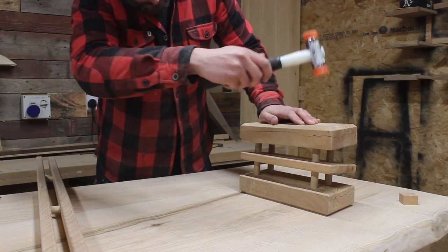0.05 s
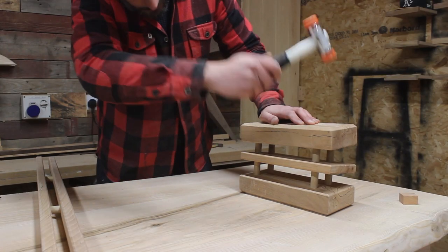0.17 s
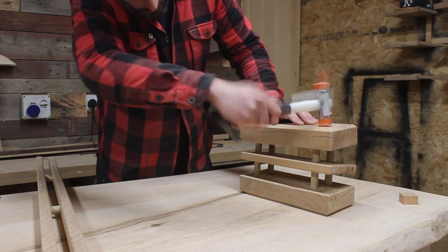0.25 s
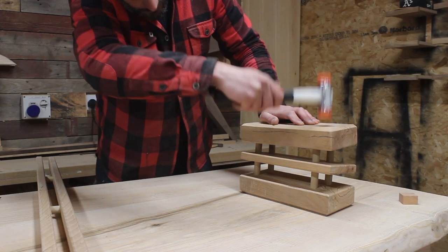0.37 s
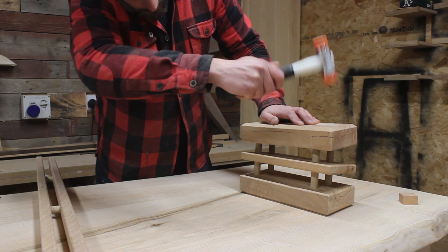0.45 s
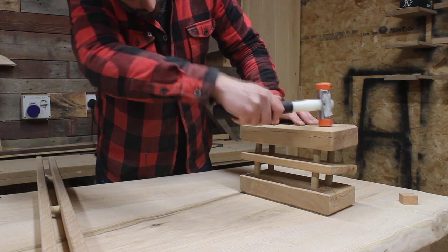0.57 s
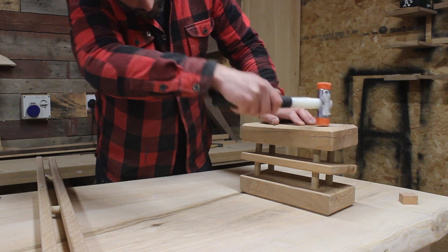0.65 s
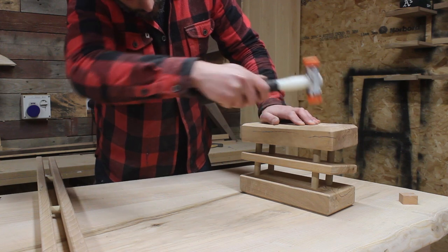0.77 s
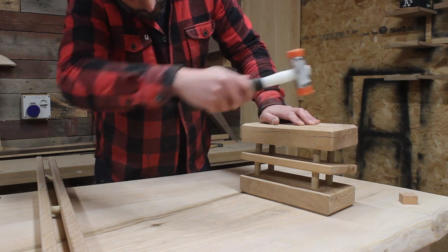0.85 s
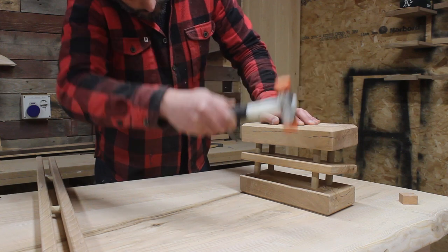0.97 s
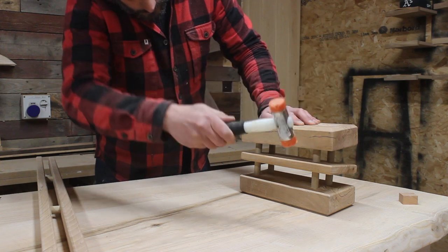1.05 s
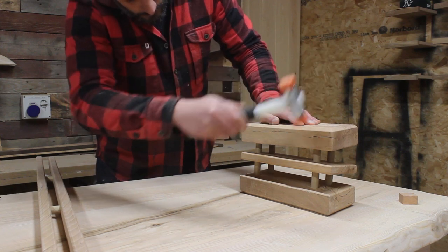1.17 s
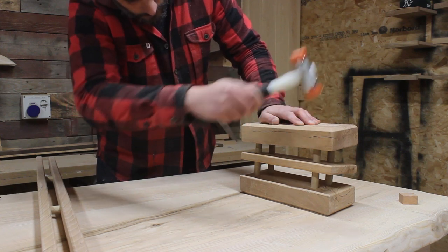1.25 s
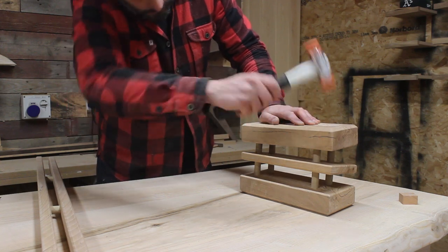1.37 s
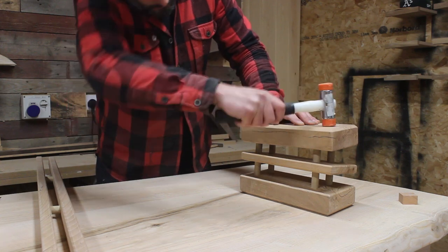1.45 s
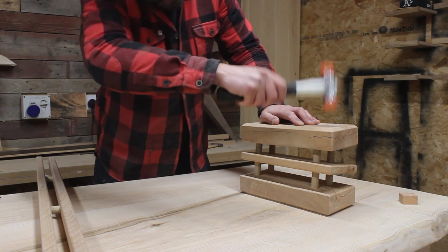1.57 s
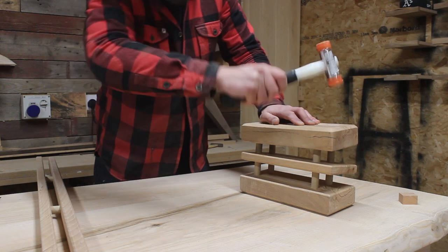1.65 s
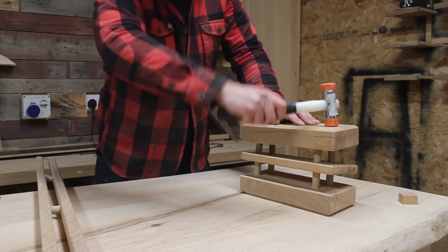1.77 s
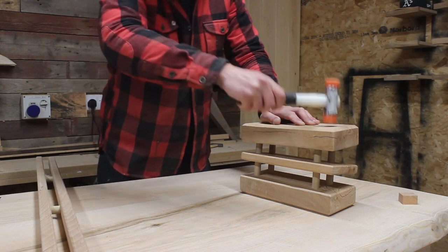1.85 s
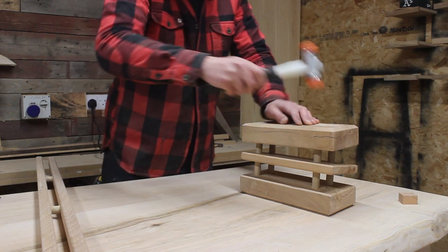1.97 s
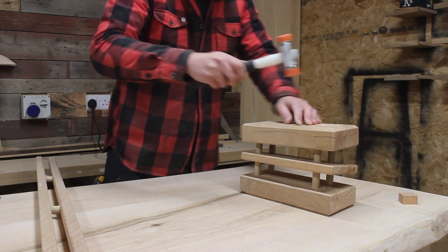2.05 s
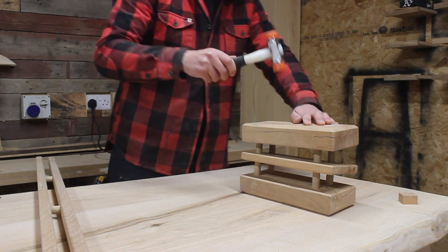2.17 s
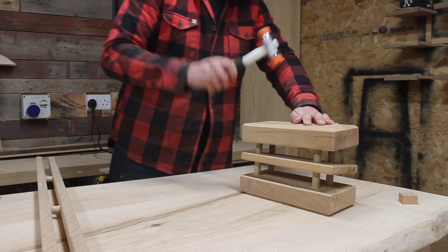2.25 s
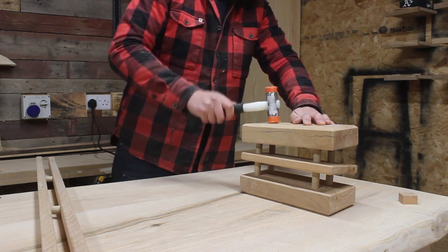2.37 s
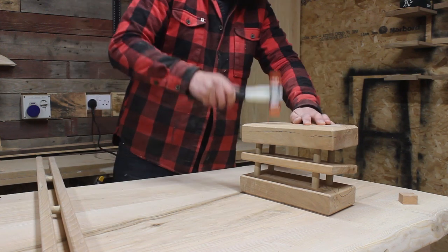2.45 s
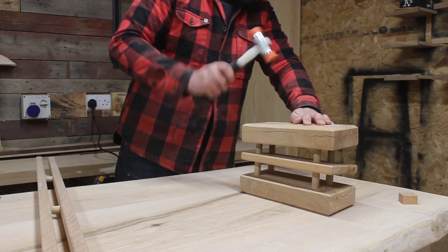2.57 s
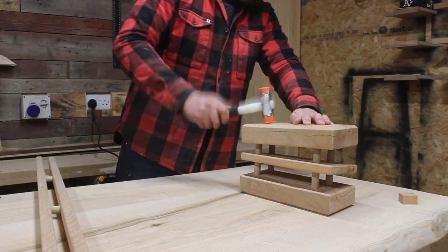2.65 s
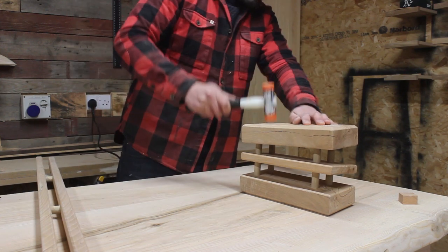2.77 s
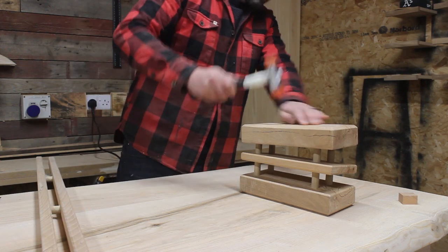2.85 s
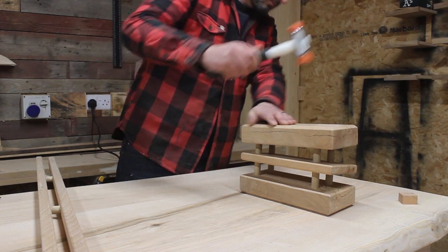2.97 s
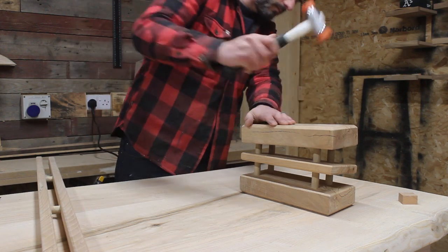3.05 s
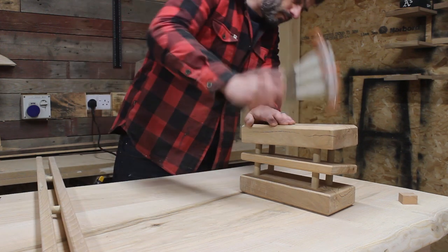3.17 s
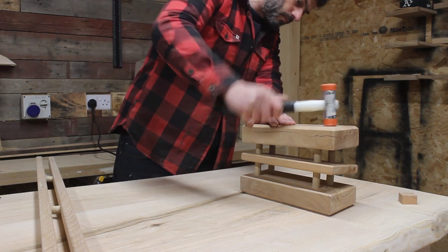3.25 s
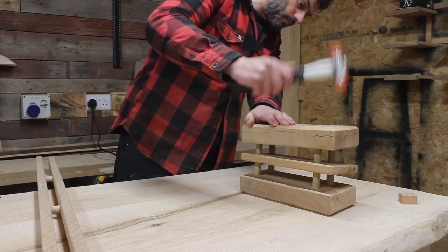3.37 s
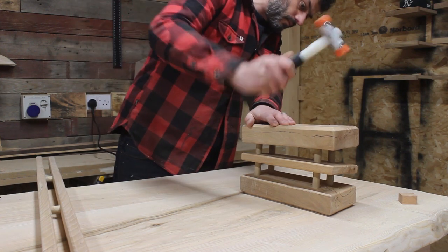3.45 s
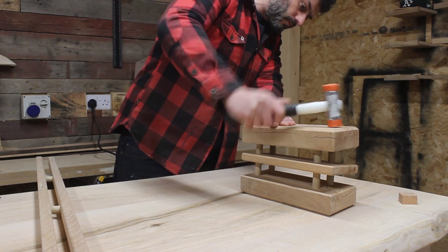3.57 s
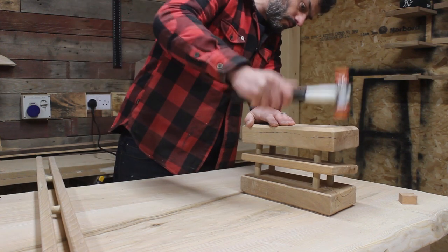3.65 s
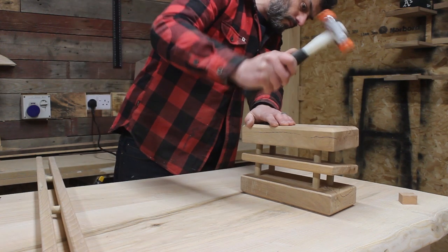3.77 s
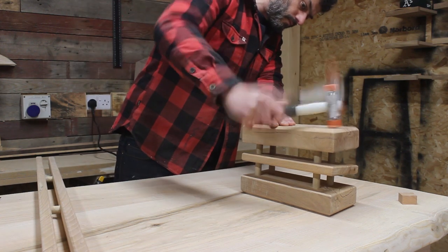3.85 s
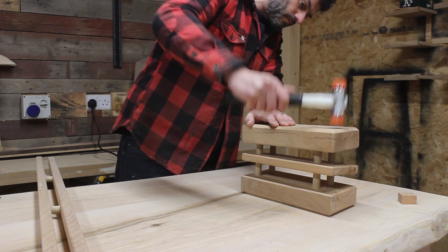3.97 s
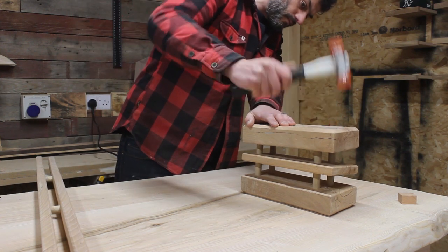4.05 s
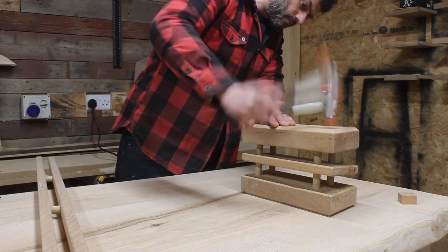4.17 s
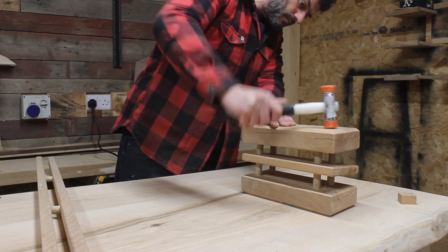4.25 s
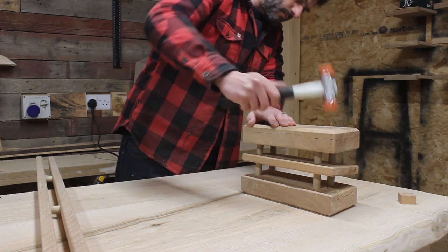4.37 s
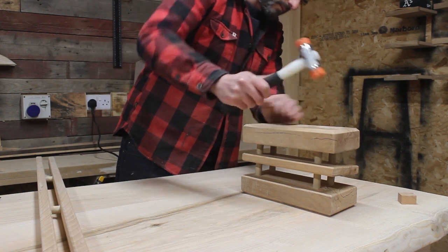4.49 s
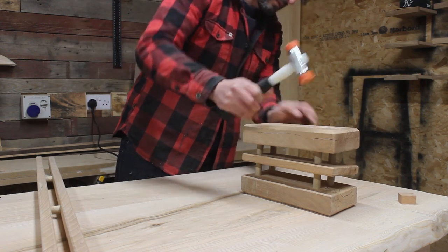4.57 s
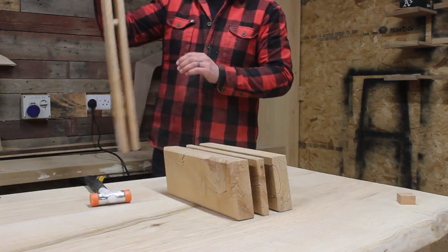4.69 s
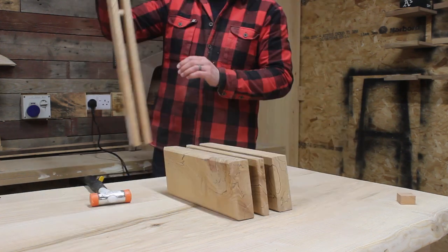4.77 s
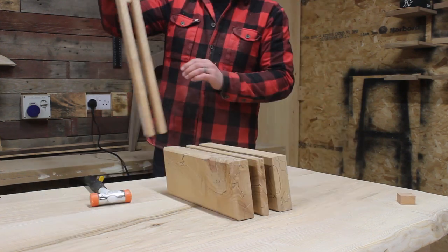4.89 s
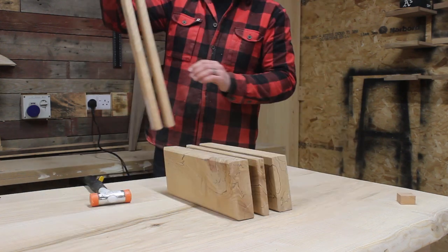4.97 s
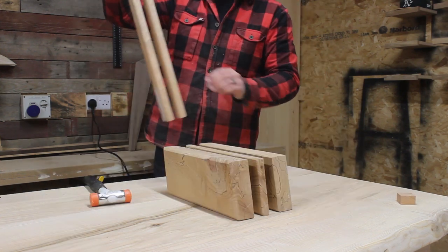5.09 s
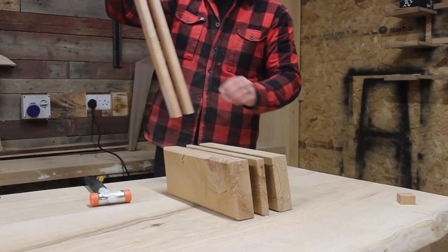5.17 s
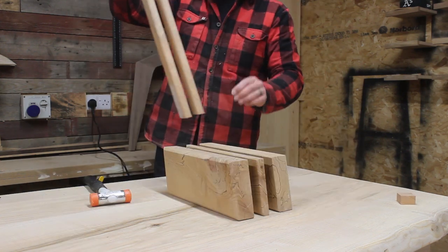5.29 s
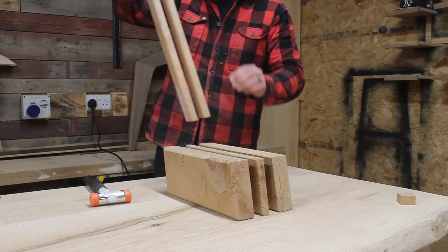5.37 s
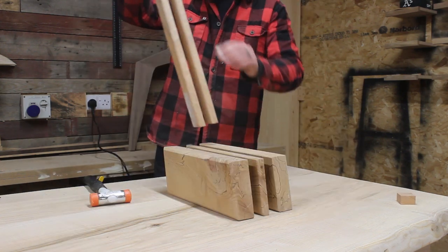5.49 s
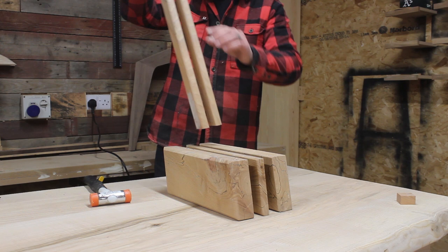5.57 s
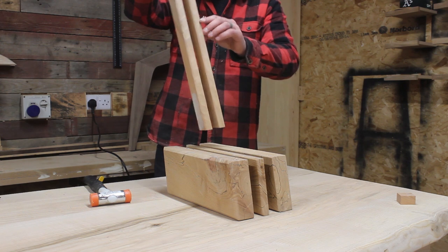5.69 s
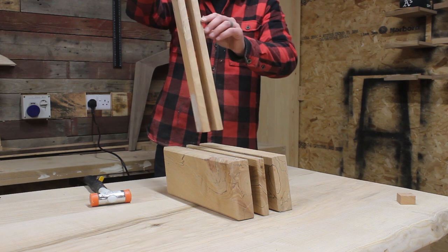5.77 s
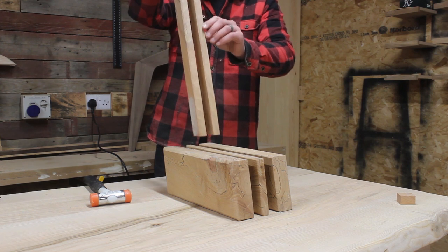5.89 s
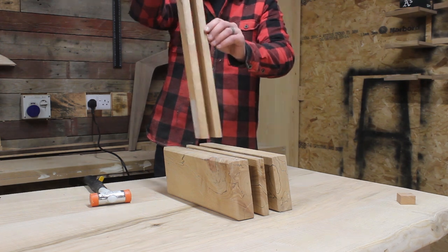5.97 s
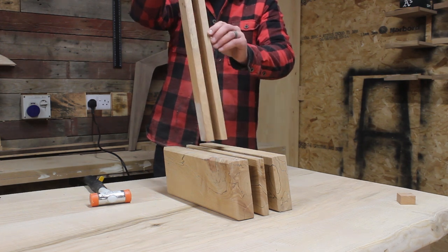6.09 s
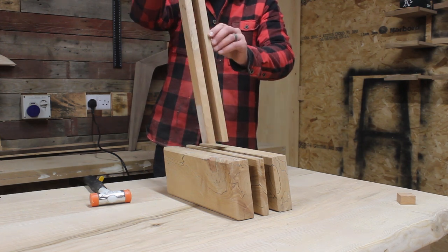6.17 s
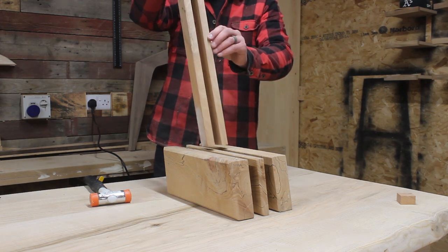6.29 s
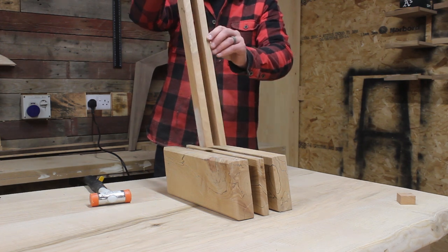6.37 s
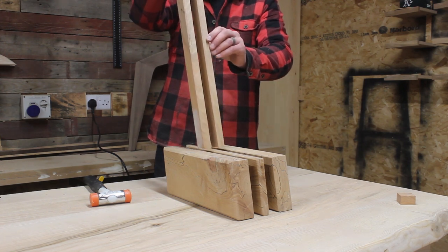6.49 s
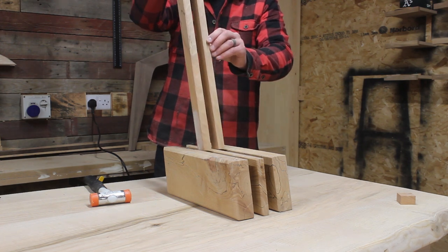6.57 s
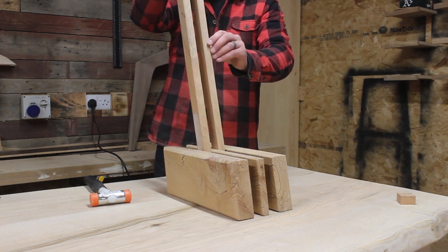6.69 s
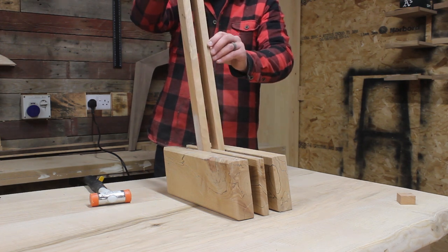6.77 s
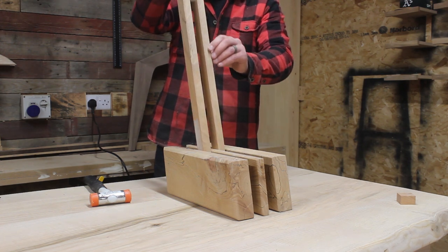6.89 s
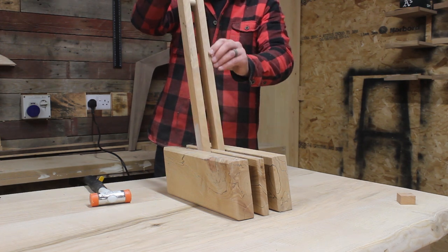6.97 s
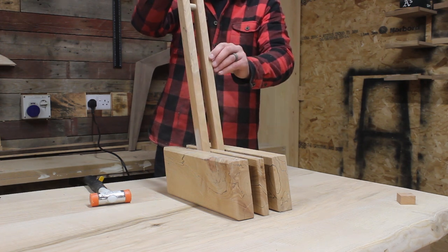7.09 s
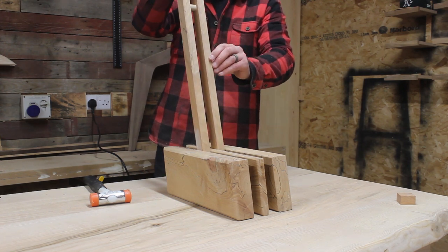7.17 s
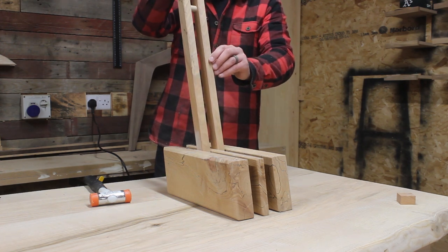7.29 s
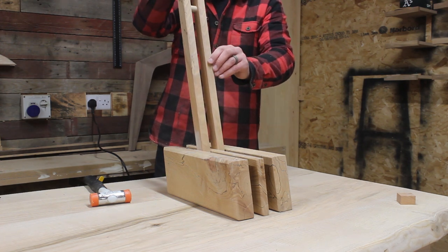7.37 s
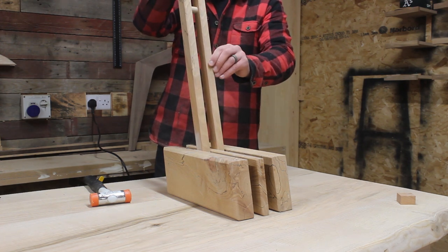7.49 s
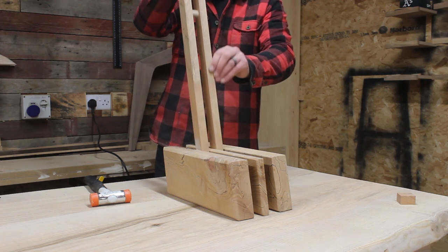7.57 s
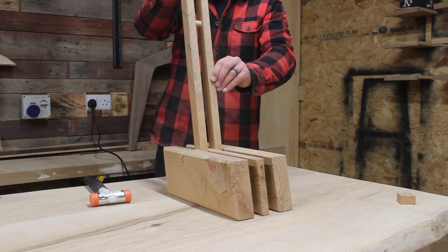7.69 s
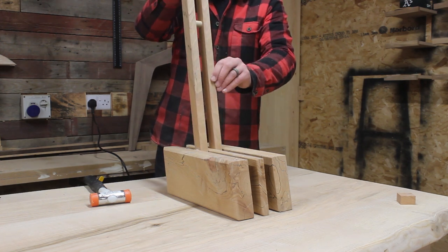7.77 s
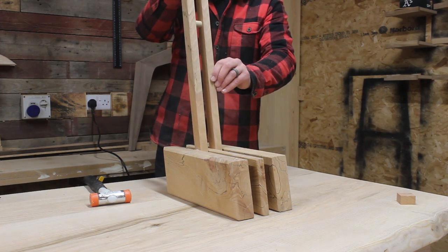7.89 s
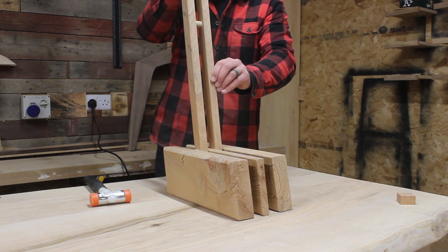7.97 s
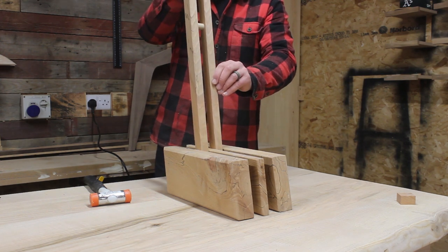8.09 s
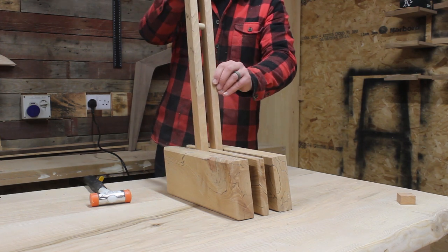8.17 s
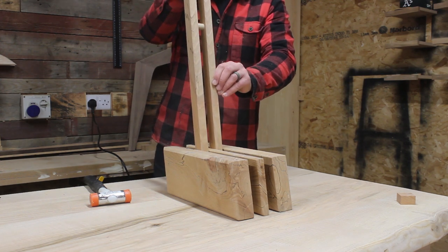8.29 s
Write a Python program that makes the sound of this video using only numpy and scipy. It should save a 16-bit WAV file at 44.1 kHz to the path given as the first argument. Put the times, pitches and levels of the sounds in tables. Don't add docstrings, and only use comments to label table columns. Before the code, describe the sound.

Soft-faced mallet bangs wood ten times, unevenly spaced and distorted; after a dip, rails jolt, drag and creak against a wooden block over faint hiss.

```python
import sys
import numpy as np
from scipy import signal
from scipy.io import wavfile
from scipy.ndimage import uniform_filter1d

SR = 44100
rng = np.random.default_rng(int(sys.argv[2]) if len(sys.argv) > 2 else 0)


def boost(x):
    u = np.asarray(x, float) / 20
    return 10 ** u


def dump(signal):
    limited = np.clip(np.atleast_2d(signal).T, -1, 1)
    pcm = np.round(limited * 32767).astype(np.int16)
    wavfile.write(sys.argv[1], SR, pcm)


N = 367353
T = np.arange(N) / SR

# start_s, level_db, bench_thud_db, knock_db (near 1350 Hz), bright_db (from 2200 Hz)
BLOWS = [
    (0.3459, -11, -5, -1.5, -3.5),
    (.6527, -13, -0.5, -5, -4),
    (1.5172, -7, -2.5, -3.5, -4.5),
    (1.806, -8.5, -3.5, -4, -4.5),
    (2.4298, -5, -13.5, 0, -2),
    (2.7428, -4.5, -9, 1, -7.5),
    (3.292, -7, -4, 3, -1),
    (3.6167, -3.5, -6.5, 0.5, -1.5),
    (3.949, -6.5, -6, 3, 2.5),
    (4.278, -13.5, 3.5, 4.5, 4),
]
EARLIER_BLOW = (-0.21, -22, -5, 3, -3)
# pitch_hz, level_db, t60_s
FRAME_MODES = [(61, -41, 0.04), (149.3, -25, 1), (190.5, -7.5, 0.22), (272.7, 2, 0.087), (323.7, 7, 0.054),
               (386.6, -9, 0.32), (440.7, 2, 0.083), (538, -2.5, 0.07), (610, -2.5, 0.15), (718, 0, 0.039),
               (805, 1, 0.026), (990, -11, 0.024), (993.4, -1.5, 0.043), (1072, -8.5, 0.31),
               (1139.6, -7, 0.14), (1254, 2.5, 0.032), (1380, -1, 0.019), (1423, -0.5, 0.036),
               (1577, -2, .03), (1768, -2, 0.032), (1838, 3, 0.02), (2155, -11.5, 0.1), (2550, -15, 0.045),
               (2424, -6.5, 0.012)]
# frequency_hz, level_db
SLAP_SPECTRUM = [(100, -29), (400, -6), (1200, -1), (2500, -11.5), (4000, -17.5), (8000, -23.5),
                 (12000, -31.5), (16000, -35)]
# time_s, level_db
MALLET_FADE = [(0, 7.5), (4.3, -2.5), (4.45, -5.5), (4.6, -11.5), (4.8, -35), (8.4, -46.5)]
# frequency_hz, t60_s
WALL_T60 = [(100, 1), (260, 0.69), (700, 0.83), (1840, 0.7), (4850, 0.44), (12800, 0.23)]
# frequency_hz, level_db
WALL_COLOUR = [(60, -10.5), (250, -7.5), (700, 3.5), (1150, 5.5), (1550, 0), (2200, 3.5), (6000, 5),
               (15000, -3.5)]
# delay_s, level_db
EARLY_ECHOES = [(.0031, -4), (.0062, -12.5), (.0105, -11.5), (.017, -14), (.024, -20.5)]

# pitch_hz, width_hz, level_db
BLOCK_MODES = [(290.3, 40, 8.5), (542, 78, -2), (699, 23, 3.5), (800, 41, -3), (930, 57, -4),
               (1130, 280, 9.5), (1215, 34, -6)]
# pitch_hz, width_hz, level_db
GRAIN_MODES = [(1610, 110, 0), (1820, 400, 14), (2220, 960, 18), (3020, 1400, 6.5)]
# pitch_hz, width_hz, level_db
FIZZ_MODES = [(4230, 1700, 3.5), (7850, 3300, -15)]
# start_s, rumble_db, t60_s, dryness_db, free_length_pitch_hz
JOLTS = [
    (6.029, -14.5, 0.64, -7, 1240),
    (6.43, -58, 0.44, -9, 750),
    (6.554, -50, .4, 2, 800),
    (6.671, -37, 0.24, -7.5, 745),
    (6.751, -33, 0.54, -17, 1000),
    (7.791, -28.5, 0.37, -8.5, 740),
    (8.019, -43, .3, -11, 735),
]
# start_s, length_s, rumble_db, dryness_db, pitch_hz
SLIDES = [
    (6.26, .05, -52, 1.5, 780),
    (6.695, 0.096, -33, -23, 760),
    (6.849, 0.24, -41.5, -7, 800),
    (6.988, .25, -42.5, -5, 1130),
    (7.494, .1, -48.5, -3.5, 800),
    (7.587, 0.22, -42.5, 1.5, 1010),
    (7.703, .05, -58.5, 13, 1020),
    (7.803, 0.24, -29.5, -12, 637),
    (8.038, .22, -47, -4.5, 870),
    (8.304, 0.098, -37.5, -13, 632),
]
# start_s, peak_db, pitch_hz, thud_db, tick_db
KNOCKS = [(6.0294, -14.5, 620, 2, -16), (6.356, -39, 2030, -18, -26), (6.448, -38.5, 684, -1, -27),
          (6.5556, -38, 2100, -21, 6.5), (6.675, -34, 920, 0.5, -17), (6.697, -41, 780, -12, 6.5),
          (6.7509, -19.5, 1645, -32, -28), (6.784, -27, 930, -26, -37), (7.041, -36, 1900, 0.5, -18.5),
          (7.51, -45, 2350, -22, -27), (7.793, -29, 1297, -27, -23), (7.81, -27.5, 650, -17, -11),
          (7.98, -36, 685, -16, -36), (8.022, -37, 686, 5, 1.5), (8.142, -38, 1130, -16, -3.5)]
# start_s, level_db, pitch_hz
THUMPS = [
    (6.7494, -33, 141),
    (7.764, -35.5, 117),
    (7.793, -45, 117),
]
# start_s, length_s, pitch_hz, level_db, step_db (per overtone)
SQUEAKS = [(6.283, 0.024, 1980, -38.5, -7.5), (7.6, .025, 2300, -61, -3), (7.9, 0.031, 1900, -50, -17),
           (7.668, 0.064, 3250, -38.5, -12), (6.98, .18, 1990, -45, -30), (6.9, .18, 2880, -54, -30),
           (7.795, .035, 5200, -53, -20), (8.6, .045, 4620, -52, -22), (6.76, 0.11, 900, -36, -27),
           (9.9, .16, 680, -35, -20), (7.83, .12, 560, -33, -20), (8.296, 0.058, 617, -36.5, -34)]
# start_s, length_s, from_hz, to_hz, level_db
BIRD_NOTES = [
    (.08, 0.11, 3200, 3070, -73.5),
    (4.65, 0.11, 3130, 3050, -67),
    (4.78, 0.092, 3070, 3560, -60),
    (4.84, 0.095, 3480, 2960, -57.5),
    (4.86, 0.116, 3580, 3560, -62.5),
    (4.8, .17, 4500, 4700, -67),
]
# pitch_hz, width_hz, level_db
DRONE_MODES = [(73, 30, -3.5), (188, 25, 1.5)]
# frequency_hz, density_db (per Hz)
HISS_SPECTRUM = [(15, -34.5), (27, -16.5), (57, -15), (85, -2.5), (113, -9.5), (233, -3.5), (442, -2.5),
                 (900, -6.5), (2000, -13), (4000, -20.5), (7000, -26), (10000, -29), (15800, -28)]

DUCK_DB, HOLD_S, RECOVER_DB_PER_S = -12, 0.43, 32
CHANGE_S, CHANGE_DB, OUT_S, IN_S = 4.607, -19.5, 0.46, 0.52


def evened(x):
    return x / np.sqrt(np.mean(x ** 2) + 1e-20)


def read(points, hz):
    f, value = np.transpose(points)
    return np.interp(np.log(hz + 1), np.log(f + 1), value)


def add(mix, s, sound):
    at = round(s * SR)
    sound = sound[max(-at, 0):]
    part = mix[max(at, 0):][:len(sound)]
    part += sound[:len(part)]


def resonate(x, hz, width):
    turn = np.exp(2j * np.pi * np.cumsum(hz * np.ones(len(x))) / SR)
    r = np.exp(-np.pi * width / SR)
    return 2 * (turn * signal.lfilter([1 - r], [1, -r], x / turn)).real


def through(x, modes):
    out = np.zeros(len(x))
    for hz, width, db in modes:
        r = np.exp(-np.pi * 1.5 * width / SR)
        pole = r * np.exp(2j * np.pi * hz / SR)
        ring = signal.lfilter([(1 - r) ** 2], [1, -2 * pole, pole ** 2], x).real
        out += boost(db) / np.sqrt(width) * ring
    return evened(out)


def causal(gain):
    return np.fft.ifft(np.exp(np.conj(signal.hilbert(np.log(gain))))).real[:len(gain) // 2]


def blow(db, thud_db, knock_db, bright_db):
    t = np.arange(SR // 2) / SR
    f = abs(np.fft.fftfreq(8192, 1 / SR))
    hz, mode_db, t60 = np.transpose(FRAME_MODES)[:, :, None]
    spread, phase = rng.standard_normal((2, len(FRAME_MODES), 1))
    spot = [(350, thud_db), (650, -2.5 + 0.7 * thud_db), (1000, 0.0068), (1160, 0),
            (1350, knock_db), (2200, bright_db)]
    size = boost(mode_db + read(spot, hz) + 0.71 * spread)
    rise = 1 - np.exp(-(t / (0.001 + 1.0 / hz)) ** 2)
    ring = (size * boost(-60 * t / t60) * rise * np.sin(2 * np.pi * hz * t + 3 * phase)).sum(0)

    slap = boost(read(SLAP_SPECTRUM, f) + bright_db + 26.0)
    rattle = rng.standard_normal(len(t)) * boost(-17.5 - 60 * t / 0.085)
    rattle *= np.clip(t / 0.00022, 0, 1) ** 2
    direct = ring + signal.fftconvolve(rattle, causal(slap))[:len(t)]

    modes_power = (size * SR / (4 * np.pi)) ** 2 / ((f - hz) ** 2 + (1.7 / t60) ** 2)
    modes_power = modes_power / (1 + (f / (2.7 * hz)) ** 4)
    blend = causal(np.sqrt(boost(-5.5) * modes_power.sum(0) + boost(14) * slap ** 2))
    return boost(db + 2.5) * direct, boost(db + 4.5) * blend


def mallet():
    out, last_s = np.zeros(N), -1
    for s, *row in [EARLIER_BLOW] + list(BLOWS):
        direct, blend = blow(*row)
        sound = boost(-4.0) * signal.fftconvolve(blend, walls())
        add(sound, 0, direct)
        surge_db = 1.6 + 23.1 * min(s - last_s, 0.9)
        last_s = s
        clamp = np.exp(-(np.arange(len(sound)) / SR / 0.0063) ** 2)
        add(out, s, sound * boost(surge_db * clamp - 5.5))
    out = signal.sosfilt(signal.butter(2, 105, "highpass", fs=SR, output="sos"), out)
    return out * boost(np.interp(T, *np.transpose(MALLET_FADE)))


def walls(size=36000):
    hz, t, z = signal.stft(rng.standard_normal(size), SR, nperseg=256)
    fall_db = -60 * t / read(WALL_T60, hz)[:, None]
    late = boost(-11.5 + 0.79 * fall_db)
    z = z * boost(read(WALL_COLOUR, hz))[:, None] * np.hypot(boost(1.13 * fall_db), late)
    tail = signal.istft(z, SR, nperseg=256)[1][:size]
    tail *= np.clip(np.arange(size) / SR / 0.0061, 0, 1)
    tail /= np.linalg.norm(tail)
    for s, db in EARLY_ECHOES:
        tail[round(s * rng.uniform(0.9, 1.1) * SR)] += boost(db + 1.0) * rng.choice([-1, 1])
    return tail


def jolt(s, db, t60, dry_db, hz):
    hold_s, rise_s = 0.038, 0.0015
    t = np.arange(0, hold_s + t60, 1 / SR)
    fall_db = -60 * np.maximum(t - hold_s, 0) / t60
    rise = np.clip(t / rise_s, 0, 1)
    return s, rise * boost(db + fall_db), rise * boost(db + 1.38 * fall_db), dry_db, hz


def slide(s, length, db, dry_db, hz):
    u = np.arange(0, 1, 1 / (length * SR))
    swell = boost(db - 14 * (2 * u - 1) ** 2) * signal.windows.tukey(len(u), 0.1)
    return s, swell, swell, dry_db, hz


def rails():
    slips_per_s = np.array([[2000], [5000], [9000]])
    slips = boost(2.3 * np.minimum(rng.exponential(1, (3, N)), 5)) * rng.choice([-1, 1], (3, N))
    slips = slips * (rng.random((3, N)) < slips_per_s / SR)
    drag = through(slips[0], [(750, 380, 0)])
    block = evened(through(slips[0], BLOCK_MODES) + 1.12 * drag)
    scrape = through(slips[1], GRAIN_MODES)
    fizz = through(slips[2], FIZZ_MODES)
    out = np.zeros(N)
    moves = [jolt(*row) for row in JOLTS] + [slide(*row) for row in SLIDES]
    for s, low, dry, dry_db, hz in moves:
        start = round(s * SR)
        at = slice(start, min(start + len(low), N))
        note = resonate(resonate(slips[1, at], hz, 98), hz, 98) / np.std(slips[1]) * boost(16.0)
        wood = 0.63 * block[at] + boost(1) * note
        grain = boost(dry_db) * scrape[at] + boost(-10.5 + 1.74 * dry_db) * fizz[at]
        out[at] += low[:len(wood)] * wood + dry[:len(wood)] * grain
    return out


def knocks():
    t, out = np.arange(6000) / SR, np.zeros(N)
    thud_hz = 285
    for s, db, hz, thud_db, tick_db in KNOCKS:
        noise = rng.standard_normal((2, len(t)))
        ring = np.sin(2 * np.pi * hz * t) * boost(-3 - 60 * t / 0.06)
        puff = through(noise[0], [(1.3 * hz, 600, 0)]) * boost(-7 - 60 * t / 0.056)
        thud = np.sin(2 * np.pi * thud_hz * t) * boost(thud_db - 60 * t * thud_hz / 28)
        tick = through(noise[1], [(6630, 19000, 0)]) * boost(tick_db + 8 - 60 * t / 0.0053)
        add(out, s, boost(db) * (ring + puff + thud + tick) * np.clip(t / 0.0012, 0, 1))
    for s, db, hz in THUMPS:
        add(out, s, np.sin(2 * np.pi * hz * t) * boost(db - 60 * t * hz / 26))
    return out + boost(-6.5) * signal.fftconvolve(out, walls())[:N]


def squeaks():
    out = np.zeros(N)
    for s, length, hz, db, step_db in SQUEAKS:
        n = round(length * SR)
        waver = uniform_filter1d(rng.standard_normal(size=8000), size=200)[:n]
        turns = np.cumsum(hz * (1 + 0.17 * waver)) / SR
        tone = sum(boost(step_db * k) * np.sin(2 * np.pi * (k + 1) * turns) for k in range(4))
        add(out, s, boost(db) * np.hanning(n) * tone)
    return out


def bird():
    out = np.zeros(N)
    for s, length, from_hz, to_hz, db in BIRD_NOTES:
        n = round(length * SR)
        whistle = resonate(rng.standard_normal(12000)[:n], np.linspace(from_hz, to_hz, n), 120)
        add(out, s, boost(db) * evened(whistle) * signal.windows.tukey(n, 0.6))
    return out


def ducking_db(t):
    blows = np.array([EARLIER_BLOW[0]] + [row[0] for row in BLOWS])
    since = t - blows[np.searchsorted(blows, t) - 1]
    return np.minimum(DUCK_DB + RECOVER_DB_PER_S * np.maximum(since - HOLD_S, 0), 0)


def scene_change_db(t):
    return np.interp(t, [CHANGE_S - OUT_S, CHANGE_S, CHANGE_S + IN_S], [0, CHANGE_DB, 0])


def drone():
    fade_db = np.interp(T, [CHANGE_S - OUT_S, CHANGE_S], [0, -25])
    duck_db = 0.65 * uniform_filter1d(ducking_db(T), size=1500)
    return boost(-56 + fade_db + duck_db) * through(rng.standard_normal(N), DRONE_MODES)


def hiss():
    frames, hz = N // 512 + 5, np.fft.rfftfreq(2048, 1 / SR)[:, None]
    a, b, patches = rng.standard_normal((frames, 1025, 3)).T
    patches = evened(uniform_filter1d(uniform_filter1d(patches, size=20, axis=0), size=7, axis=1))
    t = np.arange(frames) * 512 / SR
    tilt = 0.32 / (1 + (11000 / (hz + 1)) ** 6) - 0.47 / (1 + (hz / 1500) ** 2)
    tilt_db = ducking_db(t) * tilt
    noise, spectrum_db = a + 1j * b, read(HISS_SPECTRUM, hz)
    flat = signal.istft(noise * boost(spectrum_db), nperseg=2048, noverlap=1536)[1]
    full = signal.istft(noise * boost(spectrum_db + tilt_db + 1.0 * patches), nperseg=2048, noverlap=1536)[1]
    gain_db = np.minimum(uniform_filter1d(ducking_db(T), size=1500), scene_change_db(T))
    return boost(-47.5 + gain_db) * full[:N] / np.std(flat)


def scene():
    bass_cut = signal.butter(2, 95, "highpass", fs=SR, output="sos")
    handling = signal.sosfilt(bass_cut, rails() + knocks())
    return (mallet() + handling + squeaks() + bird() + hiss() + drone())[None]


def top_cut(x):
    return signal.sosfilt(signal.butter(12, 15880, fs=SR, output="sos"), x)


def record(dry):
    mix = np.clip(dry, -1, 1)
    return top_cut(mix)


dry = scene()
out = record(dry)
dump(out)
```